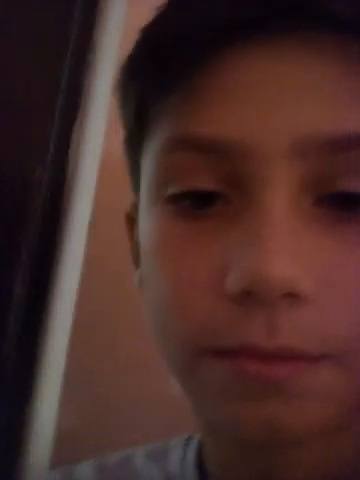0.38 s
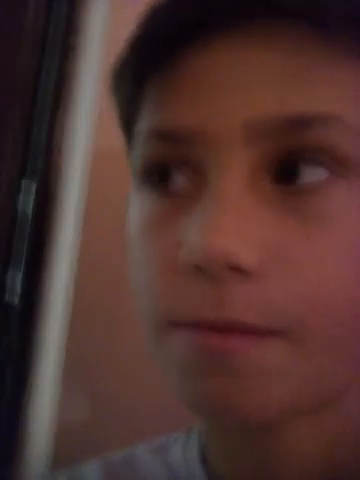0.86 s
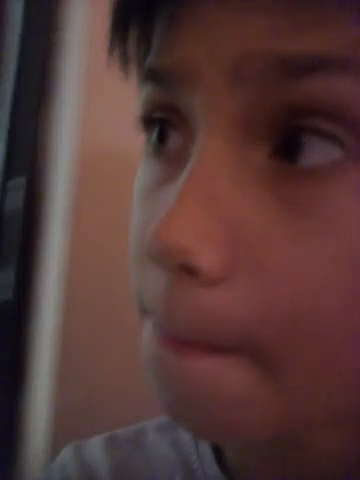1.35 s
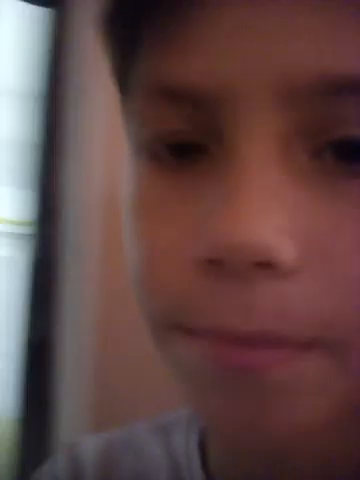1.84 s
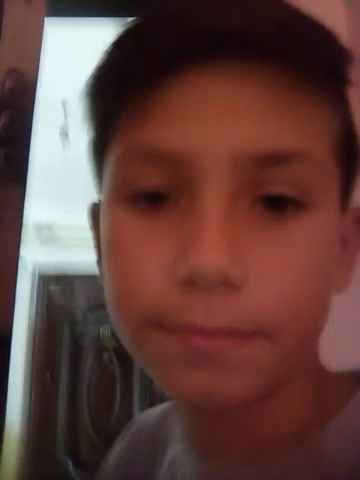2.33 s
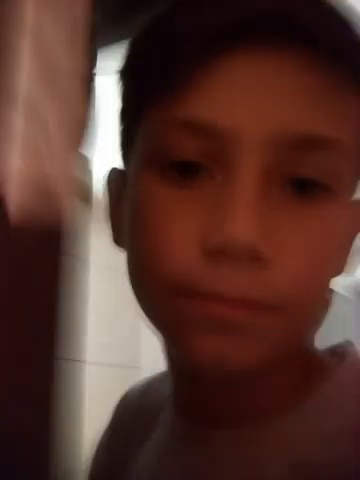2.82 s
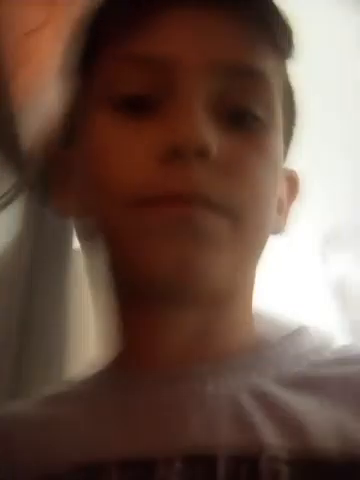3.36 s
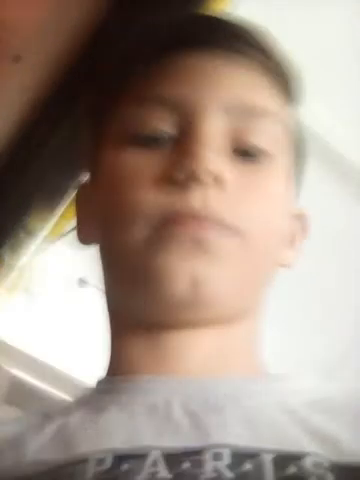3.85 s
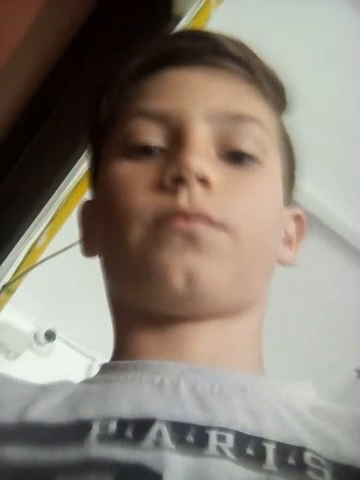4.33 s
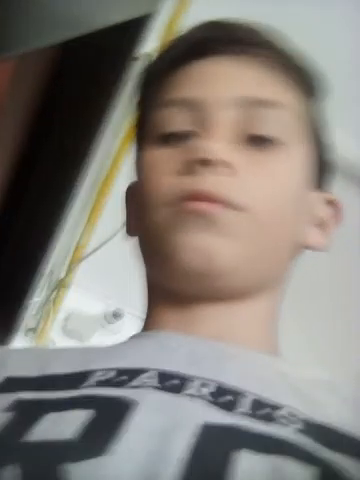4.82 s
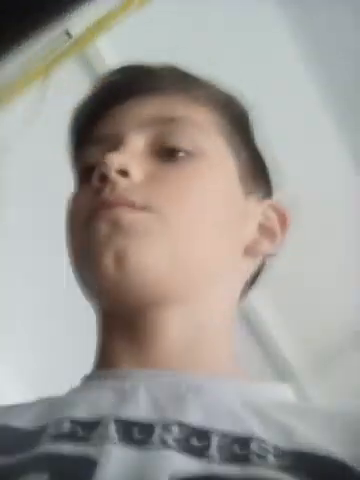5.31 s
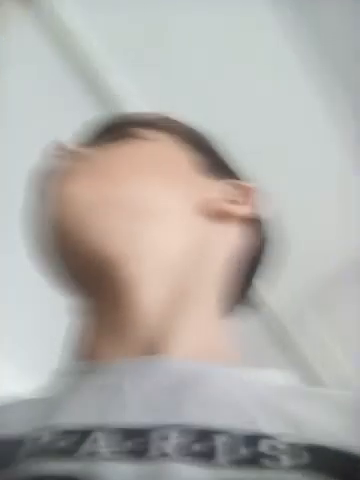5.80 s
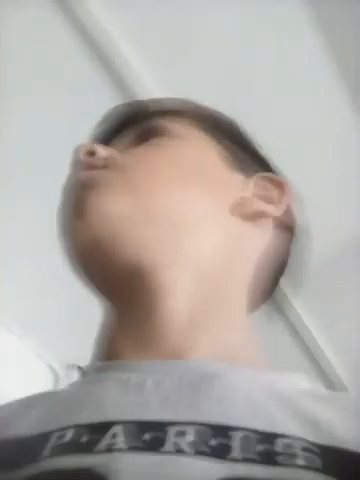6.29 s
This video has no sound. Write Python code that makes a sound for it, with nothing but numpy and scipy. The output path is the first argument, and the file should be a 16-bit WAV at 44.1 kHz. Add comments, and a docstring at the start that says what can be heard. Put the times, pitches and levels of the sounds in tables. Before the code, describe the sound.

A quiet, hissy handheld phone recording. A bolt chatters faintly inside a door and clunks open at about one and a half seconds with a burst of keys. Keys tick, two dry plastic clicks snap right at the microphone, light knocks and scuffs follow. Finally the door scrapes, bangs at the latch, squeaks thinly and slams, echoing in a bare stairwell.

```python
"""A bare stairwell outside a furnished flat, a hand-held phone as the microphone: someone unlocks the door,
keys ticking, steps out and pulls it shut; it scrapes, squeals, bangs at the latch, slams and rings on.
Blows are noise bursts with door modes, the lock is resonant chatter, keys are short tones with cracks,
the hinge is a fluttering tone and scuffs are lumpy noise. Noise tails make the echo, soft hiss the air.
The phone's case snaps twice in the hand, close and without any room."""
import sys
import numpy as np
from scipy import signal
from scipy.fft import rfft, irfft, next_fast_len
from scipy.io import wavfile
from scipy.ndimage import uniform_filter1d, map_coordinates

SR = 44100
rng = np.random.default_rng(int(sys.argv[2]) if len(sys.argv) > 2 else 0)


def transcribe(signal):
    """Save signal, clipped to [-1, 1], as a 16-bit WAV file at the path in sys.argv[1]."""
    frames = np.atleast_2d(signal).T
    limited = np.clip(frames, -1, 1)
    pcm = np.round(limited * 32767).astype(np.int16)
    wavfile.write(sys.argv[1], SR, pcm)


def invert_db(level):
    """Linear amplitude ratio for a level in decibels (20 dB per decade), elementwise."""
    return 10 ** (np.asarray(level, dtype=float) / 20)


N = 294147  # samples, 6.67 s


def unit(x):
    """Scale to rms 1."""
    return x / np.sqrt(np.mean(x ** 2) + 1e-20)


def along(points, hz):
    """Read (f/Hz, value) points on a log frequency axis."""
    f, v = np.transpose(points)
    return np.interp(np.log(hz + 1), np.log(f + 1), v)


def filtered(x, response):
    """Multiply the spectrum of x by a complex response of frequency."""
    m = 2 * next_fast_len(len(x) // 2 + 4096)
    return irfft(rfft(x, m) * response(np.fft.rfftfreq(m, 1 / SR)), m)[:len(x)]


def coloured(x, spectrum):
    """Pass x through a causal (f/Hz, level/dB) colour; white noise keeps its rms."""
    def response(hz):
        # folding the cepstrum forward in time gives the minimum phase
        cepstrum = irfft(np.log(invert_db(along(spectrum, hz))))
        half = len(cepstrum) // 2
        cepstrum[1:half] *= 2
        cepstrum[half + 1:] = 0
        log_response = rfft(cepstrum)
        return unit(np.exp(log_response.real)) * np.exp(1j * log_response.imag)
    return filtered(x, response)


def wander(t, rate_hz, knots):
    """Smooth random curve with rate_hz new values a second."""
    return map_coordinates(rng.standard_normal(knots), [t * rate_hz])


def gritty(lumps_hz, lumps_db):
    """Noise whose strength jumps about as surfaces catch and slip."""
    lumps = invert_db(lumps_db * wander(np.arange(N) / SR, lumps_hz, 2 * SR))
    return unit(lumps * rng.standard_normal(N))


def patchy(x, patchy_db):
    """Give x random patches of gain over time and frequency."""
    z = signal.stft(x, nperseg=512)[2]
    field = uniform_filter1d(rng.standard_normal(z.shape), size=5, axis=0)
    field = uniform_filter1d(field, size=9, axis=1)
    return unit(signal.istft(z * invert_db(patchy_db * unit(field)), nperseg=512)[1][:N])


def add(track, s, sound):
    """Mix sound into track from time s."""
    part = track[round(s * SR):][:len(sound)]
    part += sound[:len(part)]


def strokes(s, db, rise_s, fall_s):
    """Gain per sample of strokes that climb 20 dB in rise_s to their peak and lose 20 dB in fall_s."""
    t = np.arange(0, N, 32) / SR
    lag = t[:, None] - s
    loss = np.where(lag < 0, -lag / rise_s, lag / fall_s)
    return np.interp(np.arange(N) / SR, t, invert_db(db - 20 * loss).sum(axis=1))


# modes of the door and its metal fittings: f/Hz, level/dB, t60/s
DOOR_MODES = [(245.4, -1.5, 0.32), (301, -1.5, 0.22), (496.5, 0.5, 0.092), (790, 8, 0.017),
              (1075, -4.5, 0.092), (1344, 6, 0.026), (1600, -12.5, 0.16), (1770, -12, 0.035)]


def blow(colour, t60, body_hz):
    """A jolt and a dying, rattling burst of the given colour; the struck part and the door's modes ring anew."""
    jolt = 2.63  # first contact, beside the burst
    ring_per_khz = 0.36  # the part's own tone per kHz of its pitch: small metal parts ring most
    rattle_hz, rattle_db, rattle_s = 179.8, 6, 0.046  # loose fittings, once they have shaken loose
    t = np.arange(SR // 3) / SR
    rise = 1 - np.exp(-t / (0.011 * t60))  # soft contacts start slowly and last longer
    # rattling fittings blur each mode
    creep = np.cumsum(.015 * rng.standard_normal((len(DOOR_MODES), len(t))), axis=1)
    loosened = 1 - np.exp(-t / rattle_s)
    rattle = unit(invert_db(rattle_db * loosened * wander(t, rattle_hz, SR // 20)))
    burst = rise * invert_db(-60 * t / t60) * rattle * rng.standard_normal(len(t))
    burst[round(.03 * t60 * SR)] += jolt
    strikes_db = rng.normal(0, 0.4, len(DOOR_MODES))
    ring = np.zeros(len(t))
    for (hz, level_db, life_s), strike_db, blur in zip(DOOR_MODES, strikes_db, creep):
        fade = invert_db(level_db + strike_db + along(colour, hz) - 60 * t / life_s)
        ring += fade * np.sin(2 * np.pi * hz * t + blur)
    own_fade = invert_db(-60 * t / max(0.41 * t60, .01))
    own = ring_per_khz * body_hz / 1000 * own_fade * np.sin(2 * np.pi * body_hz * t + creep[0])
    return invert_db(-9) * (coloured(burst, colour) + rise * (0.54 * ring + own))


# knocks of door, latch and feet: t/s, level/dB, crack re body/dB, t60/s, body f/Hz
KNOCK_HITS = [(0.437, -50, 0.5, 0.11, 1170), (0.536, -41.5, -8, 0.15, 450), (0.728, -45, -11, 0.14, 440),
              (1.0987, -29.5, -24, 0.077, 497), (1.164, -34.5, -14.5, 0.076, 470),
              (1.231, -44, -4.5, 0.22, 1170), (1.31, -39.5, 1, 0.22, 565), (1.448, -36, 0, 0.075, 1810),
              (1.463, -28, -2, 0.21, 1170), (1.481, -22, 0, 0.082, 598), (2.444, -31, -22.5, 0.24, 423),
              (2.472, -34, 7, 0.11, 432), (2.503, -47.5, 7, 0.16, 442), (2.927, -42.5, -16, 0.19, 480),
              (3.004, -27.5, -12, 0.063, 635), (3.03, -38.5, -36, 0.17, 510), (3.088, -41, -4, 0.029, 1640),
              (3.178, -36, -40, 0.1, 694), (3.336, -40, -6, 0.047, 1920), (3.35, -44.5, -16.5, 0.17, 800),
              (3.372, -47.5, -16, 0.054, 1900), (3.533, -53, -44.5, 0.32, 886),
              (3.736, -29, -9.5, 0.14, 670), (4.538, -39.5, -24, 0.41, 755), (4.546, -48, -24, 0.19, 1516),
              (5.119, -30.5, -9.5, 0.23, 792), (5.103, -39.5, 1, 0.085, 3300),
              (5.188, -37, -14.5, 0.44, 1560), (5.53, -32, -7.5, 0.076, 1490),
              (5.556, -27.5, -5.5, 0.24, 1186), (5.588, -33.5, -13, 0.18, 1620),
              (5.6641, -5.5, -15.5, 0.079, 510), (5.965, -15.5, 9, 0.21, 790),
              (5.985, -19, -5.5, 0.3, 1636), (6.01, -15.5, -8, 0.1, 1200), (6.0226, -8.5, -9, 0.049, 540),
              (6.053, -17.5, -6.5, 0.07, 790), (6.061, -17, -12, 0.1, 1965), (6.099, -25, -7, 0.29, 492),
              (6.144, -22, -5, 0.13, 1410), (6.19, -25, -12, 0.073, 610), (6.478, -31, -20, 0.022, 1180)]
# weight landing, a heel or the whole leaf: t/s, level/dB, t60/s, body f/Hz
THUD_HITS = [(0.731, -51, 0.255, 282), (1.474, -35, 0.342, 160), (2.452, -32, 0.095, 153),
             (2.502, -40.5, 0.31, 143), (3.62, -53, 0.26, 146.5), (4.478, -41.5, 0.354, 225),
             (5.686, -17, 0.12, 290), (5.972, -27.5, 0.25, 252), (6.021, -16.5, 0.208, 254),
             (6.051, -22, 0.12, 255), (6.098, -26, 0.2, 142), (6.034, -18.5, 0.07, 410),
             (6.152, -21.5, 0.081, 258)]
# colour of a thud: multiple of its body f, level/dB
THUD_COLOUR = [(.12, -28.5), (.5, -11), (1, -3), (2.2, -15.5), (50, -70.5)]


def knocks():
    """Knocks have a body and a crack, thuds only weight."""
    low_db = -32  # the low end of a knock, beside its body
    out = np.zeros(N)
    for s, db, crack_db, t60, body_hz in KNOCK_HITS:
        skirt_db = -5 - 2.0 * body_hz / 1000  # the higher the part, the narrower its band
        below = [(25, low_db - 17.5), (110, low_db), (290, low_db + 14.0)]
        around = [(body_hz / np.sqrt(2), skirt_db), (body_hz, 0), (body_hz * np.sqrt(2), skirt_db)]
        above = [(2600, crack_db - 9.0), (6000, crack_db - 19.0),
                 (8500, crack_db - 32.0), (16000, crack_db - 41.5)]
        above = [p for p in above if p[0] > np.sqrt(2) * body_hz]
        add(out, s, invert_db(db) * blow(below + around + above, t60, body_hz))
    for s, db, t60, body_hz in THUD_HITS:
        colour = [(k * body_hz, level_db) for k, level_db in THUD_COLOUR]
        add(out, s, invert_db(db) * blow(colour, t60, body_hz))
    return out


def resonances(peaks):
    """Response of a row of resonances of alternating sign, sloping off below 220 Hz and above 2 kHz."""
    def response(f):
        total = 0
        for k, (centre, width, db) in enumerate(peaks):
            total = total + (-1) ** k * invert_db(db) * 1j * f * width / (centre ** 2 - f ** 2 + 1j * f * width)
        return total / (1 + 1j * f / 2000) * 1j * f / (220 + 1j * f)
    return response


# the lock worked inside the leaf, one row per push of the key:
# t/s, leaf peak level/dB, housing peak level/dB, rise/s, fall/s (20 dB each way)
LOCK_PUSHES = [(.005, -64.5, -68.5, 0.036, 0.085), (0.124, -56, -69, 0.063, 0.031),
               (0.214, -61, -87, 0.02, 0.045), (.345, -62.5, -69.5, 0.042, 0.071),
               (0.478, -54.5, -76, 0.052, 0.02), (0.562, -49.5, -75, 0.033, 0.039),
               (.64, -61.5, -65, 0.04, 0.055), (.74, -57, -78, 0.057, 0.1), (.8, -58, -75, 0.081, 0.062),
               (1.117, -51, -51.5, 0.018, 0.026), (1.198, -47.5, -69, 0.068, 0.024),
               (1.235, -63, -61.5, 0.013, 0.083), (1.275, -53, -66, 0.048, 0.087),
               (1.374, -48, -72, 0.039, 0.046), (1.491, -32.5, -39, 0.054, 0.042),
               (1.57, -60, -80, 0.09, 0.44)]
# resonances of the door leaf around the lock: f/Hz, width/Hz, level/dB
LEAF_PEAKS = [(310, 96, 4.5), (453, 149, 10.5), (602, 142, 7.5), (806, 52, -0.5), (1760, 65, -10.5),
              (2600, 200, -12.5)]
# resonances of the bolt's metal housing: f/Hz, width/Hz, level/dB
HOUSING_PEAKS = [(1170, 32, 15.5), (1330, 460, -9), (1860, 55, -3)]


def lock():
    """The bolt's chatter shakes leaf and housing, which sound only at their resonances."""
    s, leaf_db, housing_db, rise_s, fall_s = np.transpose(LOCK_PUSHES)
    chatter = gritty(lumps_hz=89.75, lumps_db=2.2)
    leaf = unit(filtered(chatter, resonances(LEAF_PEAKS)))
    housing = unit(filtered(chatter, resonances(HOUSING_PEAKS)))
    return strokes(s, leaf_db, rise_s, fall_s) * leaf + strokes(s, housing_db, rise_s, fall_s) * housing


# the bunch shifts on its ring: t/s, jingle peak level/dB, grit peak level/dB, rise/s, fall/s (20 dB each way)
KEY_SHIFTS = [(1.311, -48, -67, 0.016, 0.063), (1.464, -26, -46, 0.011, 0.045),
              (1.487, -24.5, -37, 0.024, 0.009), (1.52, -68, -67, 0.038, 0.073),
              (1.712, -60, -67.5, 0.44, 0.36), (1.856, -56.5, -96, 0.023, 0.039),
              (1.975, -61, -80.5, 0.011, 0.24), (2.027, -50, -65, 0.037, 0.022),
              (2.049, -54, -65, 0.077, 0.0051), (2.992, -71, -58, 0.0058, 0.015),
              (3.092, -49, -67.5, 0.27, 0.074), (3.225, -52.5, -93, 0.069, 0.034),
              (3.372, -51, -65, 0.015, 0.026), (5.18, -57, -74, 0.011, 0.081),
              (5.608, -47, -57, 0.039, 0.08), (5.967, -43, -58, 0.009, 0.099),
              (6.055, -60, -71, 0.055, 0.14), (6.151, -43, -50, 0.01, 0.071),
              (6.392, -59, -54.5, 0.011, 0.028)]
# keys touching: t/s, level/dB, lower ring f/Hz, upper rings re lower/dB
KEY_TICKS = [(1.1614, -54, 2460, -35), (1.3101, -45.5, 3540, 9.5), (1.34, -52, 4540, -9),
             (1.4497, -43, 3130, 9.5), (1.465, -31, 6200, -3.5), (1.7153, -30.5, 6600, -14),
             (1.761, -43.5, 6250, -23), (1.768, -47.5, 4000, -14), (1.822, -54, 6040, -30),
             (1.84, -50.5, 2510, -22), (1.8536, -35, 3200, -33), (1.8741, -42.5, 7130, -19),
             (1.972, -49, 6170, -15.5), (1.9787, -45, 6600, -9), (1.995, -47, 4830, -14),
             (2.009, -51, 5560, -8), (2.0515, -45, 5830, -9), (2.0977, -57.5, 5900, -2),
             (2.173, -52.5, 7360, -19), (2.4673, -36, 2770, -20), (2.745, -57, 2480, 6),
             (2.9923, -55, 7550, 4), (3.045, -40, 3430, -3), (3.089, -41, 7130, 2.5),
             (3.192, -59, 6000, 10), (3.374, -41.5, 6400, -13), (3.738, -36.5, 5200, -17),
             (5.069, -39, 2930, -35), (5.53, -39, 5040, -50), (6.051, -36, 2600, -13),
             (6.3895, -59, 7580, 13), (6.439, -58, 6130, 6.5)]
# upper modes of the bunch: f/Hz, level/dB
UPPER_MODES = [(9100, -14), (10300, -10.5), (11600, -2), (12300, -10.5), (13400, 3)]
# colour of the keys: f/Hz, level/dB
KEY_COLOUR = [(3000, -42.5), (7000, -3.5), (9000, -18.5), (11000, -9.5), (13500, -8.5), (15000, -14),
              (16000, 5.5)]
# colour of grit, here and in the scuffs: f/Hz, level/dB
GRIT_COLOUR = [(1200, -11), (2500, 2), (5500, 0), (7500, -18.5), (9000, -68.5)]


def keys():
    """Each touch is a crack and briefly ringing key modes, over the rubbing of the bunch."""
    s, jingle_db, _, rise_s, fall_s = np.transpose(KEY_SHIFTS)
    rubbing = patchy(coloured(gritty(lumps_hz=162.6, lumps_db=4.0), KEY_COLOUR), patchy_db=4)
    out = strokes(s, jingle_db, rise_s, fall_s) * rubbing
    t = np.arange(SR // 8) / SR
    fade = (invert_db(-60 * t / 0.0077) + 0.32 * invert_db(-60 * t / 0.019)) * (1 - np.exp(-t / 0.00037))
    upper_hz, upper_db = np.transpose(UPPER_MODES)
    for s, db, low_hz, high_db in KEY_TICKS:
        hiss = rng.standard_normal((2, len(t)))
        rough = np.cumsum(0.14 * hiss, axis=1)  # held in the hand, the ring's phase wanders
        crack = invert_db(-60 * t / 0.011) * hiss
        struck = invert_db(upper_db + 4.5 * rng.standard_normal(len(UPPER_MODES)))  # a touch strikes unevenly
        low_ring = np.sin(2 * np.pi * low_hz * t + rough[0])
        high_ring = struck @ np.sin(2 * np.pi * upper_hz[:, None] * t + rough[1])
        low = fade * low_ring + 0.37 * coloured(crack[0], GRIT_COLOUR)
        high = fade * high_ring + 0.34 * coloured(crack[1], KEY_COLOUR)
        add(out, s, invert_db(db) * (low + invert_db(high_db) * high))
    return out


# the hinge catches as the door swings: t/s, f/Hz, peak level/dB, rise/s, fall/s (20 dB each way)
HINGE_SQUEALS = [(5.3, 2370, -59, 0.02, 0.032), (5.357, 2376, -62.5, 0.045, 0.02),
                 (5.43, 2390, -55.5, 0.047, 0.0099), (5.485, 2410, -61, 0.045, 0.05),
                 (5.68, 2474, -36, 0.0068, 0.032), (5.73, 2506, -44, 0.04, 0.04),
                 (5.797, 2500, -50.5, .012, 0.04), (5.844, 2480, -49.5, 0.06, 0.09)]


def hinge():
    """A thin stick-slip tone that flutters in level."""
    s, hz, db, rise_s, fall_s = np.transpose(HINGE_SQUEALS)
    t = np.arange(N) / SR
    phase = np.cumsum(2 * np.pi * np.interp(t, s, hz) / SR + .02 * rng.standard_normal(N))
    flutter = invert_db(2.2 * wander(t, 60, SR))
    return np.sqrt(2) * strokes(s, db, rise_s, fall_s) * flutter * np.sin(phase)


# one part struck so that it rings clear, a plate, a rod or a single key: t/s, f/Hz, level/dB, t60/s
CLEAR_RINGS = [(0.525, 2500, -52, 0.075), (1.0995, 482, -38.5, 0.054), (3.004, 1590, -40.5, 0.056),
               (3.004, 790, -42, 0.055), (3.737, 738, -34, 0.045), (3.742, 528, -44.5, 0.19),
               (4.79, 1603, -55, 0.23), (4.792, 4560, -63, 0.28), (5.122, 1130, -45, .12),
               (5.194, 1546, -44, .15), (5.557, 3160, -44, 0.059), (5.666, 1058, -25, 0.1),
               (5.92, 8940, -65, 0.09), (6.011, 3990, -34, .07), (6.055, 3830, -35, .15),
               (6.054, 11000, -56, 0.34), (6.39, 7370, -64.5, 0.18)]


def pings():
    """A single mode, quickly excited and slightly unsteady."""
    out, t = np.zeros(N), np.arange(SR // 2) / SR
    for s, hz, db, t60 in CLEAR_RINGS:
        drift = np.cumsum(.001 * np.sqrt(hz) * rng.standard_normal(len(t)))
        fade = invert_db(db - 60 * t / t60) * (1 - np.exp(-t / 0.00087))
        add(out, s, fade * np.sin(2 * np.pi * hz * t + drift))
    return out


# shoes, cloth and door edge dragged along:
# t/s, body peak level/dB, grit peak level/dB, rise/s, fall/s (20 dB each way)
SCUFF_STROKES = [(1.62, -62.5, -70, 0.26, 0.22), (3.039, -83, -73.5, 1, 0.41),
                 (3.2, -65, -66.5, 0.027, 0.29), (3.641, -64, -70.5, 0.031, 0.24),
                 (3.77, -66, -62, 0.12, 0.21), (4.29, -72.5, -76, 0.58, 0.2),
                 (4.62, -64.5, -71.5, 0.38, 0.072), (5.072, -69, -56.5, 0.013, 0.22),
                 (5.12, -47.5, -62.5, 0.021, 0.18), (5.205, -50, -58.5, 0.11, 0.12),
                 (5.42, -67, -67, 0.23, 0.17), (5.559, -59, -46.5, 0.008, 0.19),
                 (5.69, -45, -58, 0.31, 0.47), (5.968, -36.5, -47.5, 0.06, 0.26)]
# colour of a scuff's body: f/Hz, level/dB
BODY_COLOUR = [(25, -51.5), (70, -27), (150, -11.5), (500, 6.5), (1500, 6.5), (2300, -7), (4000, -66.5)]


def scuff():
    """Friction: a dull body and a brighter grit, both uneven; sliding keys add grit."""
    body = patchy(coloured(gritty(lumps_hz=90.25, lumps_db=3.0), BODY_COLOUR), patchy_db=2.8)
    grit = patchy(coloured(gritty(lumps_hz=127.4, lumps_db=4.0), GRIT_COLOUR), patchy_db=2.2)
    s, body_db, grit_db, rise_s, fall_s = np.transpose(SCUFF_STROKES)
    dragged = strokes(s, body_db, rise_s, fall_s) * body + strokes(s, grit_db, rise_s, fall_s) * grit
    s, _, grit_db, rise_s, fall_s = np.transpose(KEY_SHIFTS)
    return dragged + strokes(s, grit_db, rise_s, 1.36 * fall_s) * grit  # grit outlasts the jingle


# snaps of the phone's case: t/s, level/dB, slip to catch/s, multiple of the upper modes' f, low mode gain/dB
CASE_SNAPS = [(2.3407, -21.5, .0007, .94, 4), (3.2266, -19.5, 0.00049, 1.04, -12)]
# modes of the case: f/Hz, level/dB, t60/s, share struck by the slip (the catch strikes the rest)
CASE_MODES = [(565, -9, 0.042, 0.11), (1030, -4, 0.0075, 0.088), (2280, 6.5, 0.0037, 0.087),
              (3200, -12.5, 0.0099, 0.92), (5460, 2, 0.0019, 0.97), (6600, 2.5, 0.0034, 0.84)]


def snaps():
    """A stiff plastic click right at the microphone, a slip and then the catch: no room in it."""
    out, t = np.zeros(N), np.arange(SR // 20) / SR
    hz, level_db, t60, share = np.transpose(CASE_MODES)[:, :, None]
    is_low = hz < 800
    for s, db, gap_s, pitch, low_db in CASE_SNAPS:
        tuned_hz = np.where(is_low, hz, pitch * hz)
        rings = -invert_db(level_db + low_db * is_low - 60 * t / t60) * np.sin(2 * np.pi * tuned_hz * t)
        add(out, s, invert_db(db) * (share * rings).sum(axis=0))
        add(out, s + gap_s, invert_db(db) * ((1 - share) * rings).sum(axis=0))
    shell_band = signal.butter(4, (680, 5320), 'band', fs=SR, output='sos')  # Hz, a small shell
    return signal.sosfilt(shell_band, out)


# stairwell decay: f/Hz, t60/s
STAIRS_DECAY = [(100, 1.17), (500, 1.34), (2000, 1.43), (6000, 0.55), (12000, 0.15)]
# walking out of the furnished flat: t/s, share of the stairwell's t60, echo level/dB
WAY_OUT = [(0, 0.11, -15.5), (2.2, 0.18, -7.5), (3.6, 0.43, -10), (5, 0.86, -10), (6.67, 0.92, -2.5)]


def walls(x):
    """The echo lengthens on the way out; the walker moves, so each third of a second has its own tail."""
    sparse_hz, sparse_db, sparse_s = 300, 5.5, .15  # first reflections come one by one, then merge
    out, step = np.zeros(N), SR // 3
    when, share, echo_db = np.transpose(WAY_OUT)
    for start in range(0, N, step):
        now = start / SR
        hz, t, z = signal.stft(rng.standard_normal(SR), SR, nperseg=256)
        t60 = np.interp(now, when, share) * along(STAIRS_DECAY, hz)[:, None]
        tail = signal.istft(z * invert_db(-60 * t / t60), SR, nperseg=256)[1]
        t = np.arange(len(tail)) / SR
        tail = tail * invert_db(sparse_db * np.exp(-t / sparse_s) * wander(t, sparse_hz, SR // 20))
        echo = signal.fftconvolve(x[start:start + step], tail / np.linalg.norm(tail))
        add(out, now + .006, invert_db(np.interp(now, when, echo_db)) * echo)
    return out


# colour of still air and microphone hiss: f/Hz, level/dB
AIR_COLOUR = [(15, -38.5), (25, -16.5), (137, 3.5), (516, -3), (911, -7.5), (1130, -7.5), (2050, -13),
              (5730, -16), (8140, -27.5), (14800, -29), (16000, -58)]


def still_air():
    """Faint, slightly patchy noise of the air and the microphone."""
    return invert_db(-70.5) * patchy(coloured(rng.standard_normal(N), AIR_COLOUR), patchy_db=.8)


def scene():
    """All sources, their echo, the case at the microphone and the still air."""
    keys_echo_db = -4  # the keys hang close to the phone, so the walls add less to them
    squeal_echo_db = -13  # thin tones carry little into the walls
    door = knocks() + lock() + scuff()
    bunch = keys()
    squeal = hinge() + pings()
    echo = walls(door + invert_db(keys_echo_db) * bunch + invert_db(squeal_echo_db) * squeal)
    return (door + bunch + squeal + echo + snaps() + still_air())[None]


def roll_off(x):
    """The treble ends steeply here."""
    return signal.sosfilt(signal.butter(12, 16480, fs=SR, output="sos"), x)


def record(dry):
    """The phone keeps nothing above its band limit."""
    top_hz, edge_hz = 15900, 600  # band limit and the width of its slope

    def band_limit(hz):
        return np.sin(np.pi / 2 * np.clip((top_hz - hz) / edge_hz, 0, 1)) ** 2
    mix = filtered(dry[0], band_limit)[None]
    return roll_off(mix)


dry = scene()
out = record(dry)
transcribe(out)
```